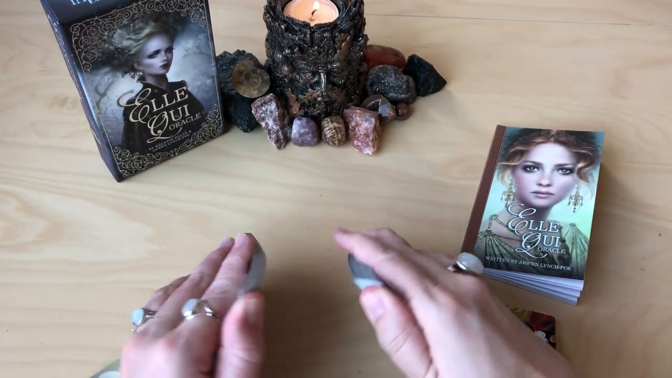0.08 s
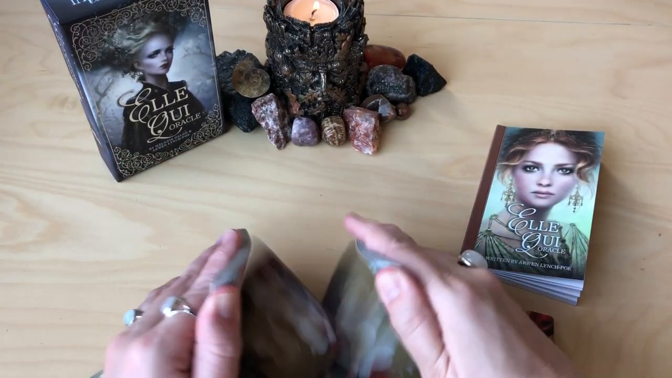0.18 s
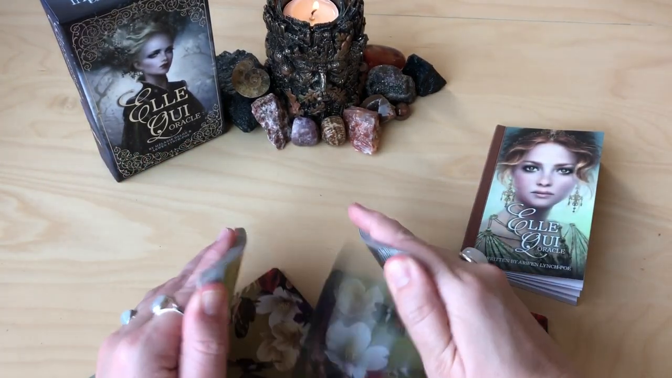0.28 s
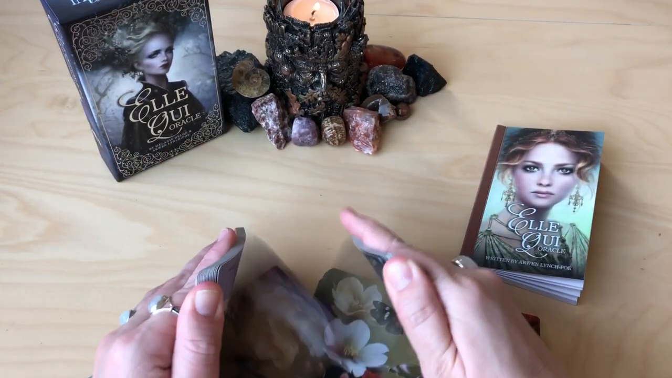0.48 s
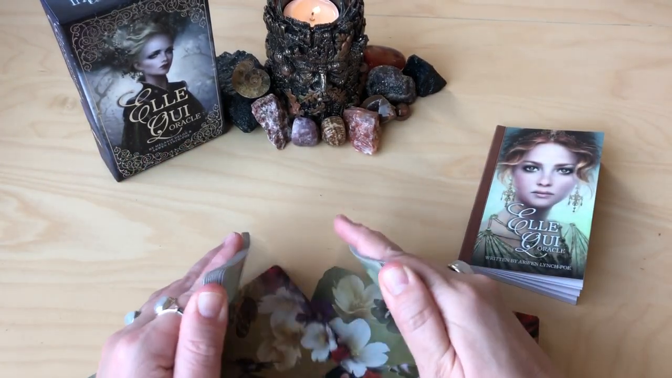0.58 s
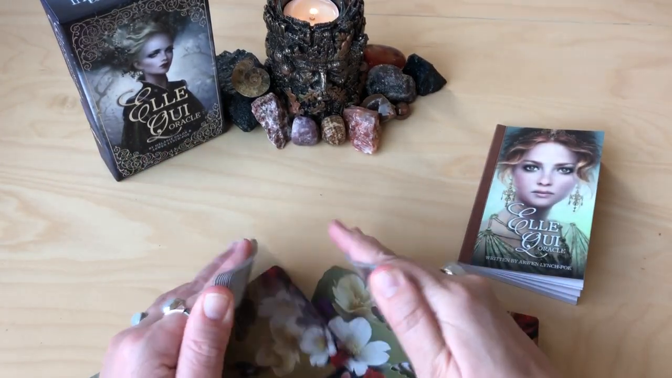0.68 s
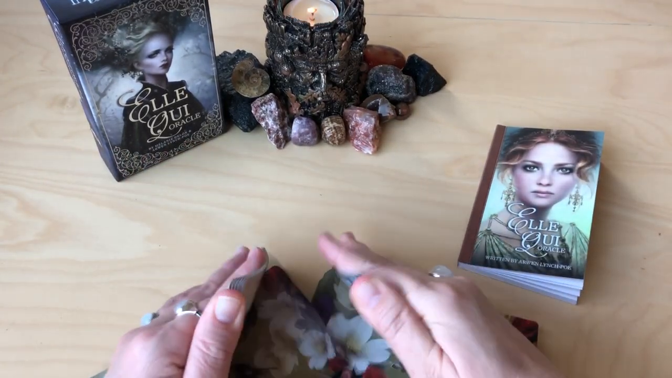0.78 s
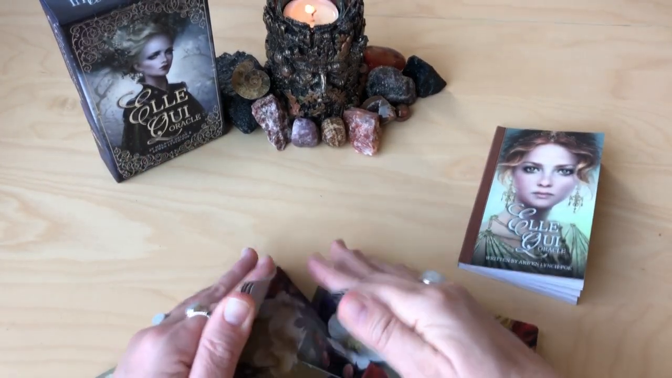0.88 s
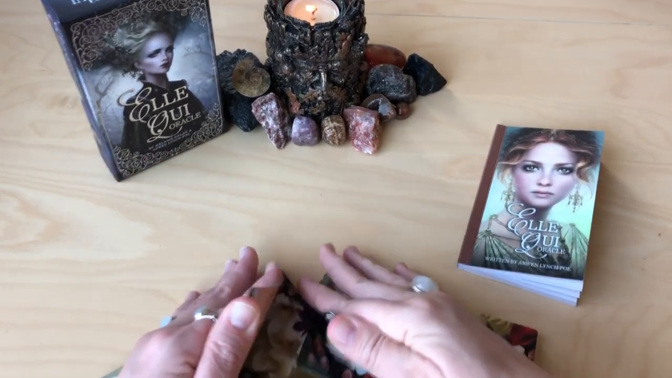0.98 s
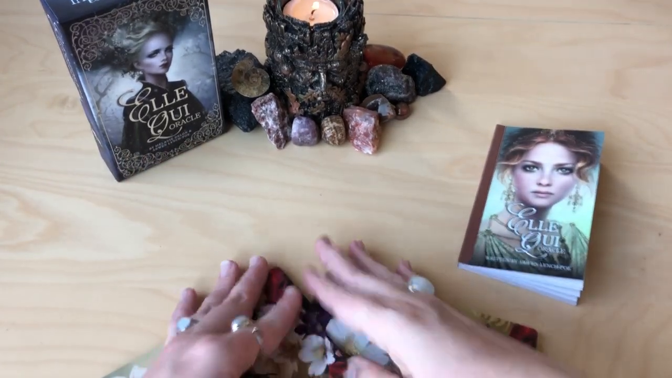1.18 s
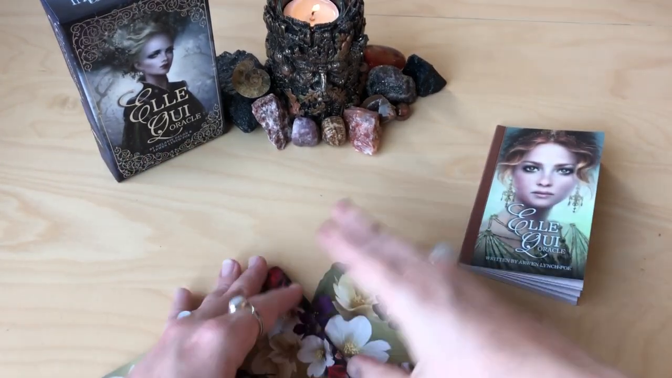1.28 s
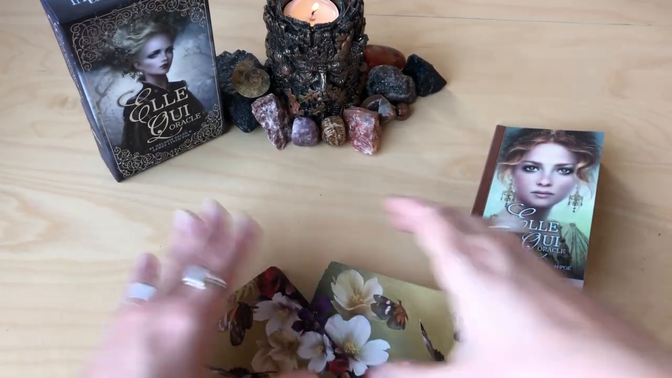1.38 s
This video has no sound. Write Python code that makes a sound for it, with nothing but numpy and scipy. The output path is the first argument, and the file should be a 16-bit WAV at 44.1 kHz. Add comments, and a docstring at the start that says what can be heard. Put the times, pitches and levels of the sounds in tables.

```python
"""Large stiff cards snap brightly one by one as two halves of a deck are riffled together on a wooden table.
Each snap is a jolt and a noisy slip that ring the card edge, with a crack, a click and a fading shiver.
Wobbling tones make air claps between clumps and one landing's low pop; other landings pop and ring the table.
Noise makes the rest: faces rustle in grains and scuff, hands rumble through the table, the quiet room adds a
short tail and a faint hum, and at the start a faint hiss dies away."""
import sys
import numpy as np
from scipy import signal
from scipy.fft import rfft, irfft
from scipy.io import wavfile
from scipy.ndimage import uniform_filter1d

SR = 44100
rng = np.random.default_rng(int(sys.argv[2]) if len(sys.argv) > 2 else 0)


def persist_wave(psi):
    """Save psi, clipped to +-1, as 16-bit WAV."""
    counts = np.round(np.clip(psi, -1, 1) * 32767).astype(np.int16)
    wavfile.write(sys.argv[1], SR, np.atleast_2d(counts).T)


def volts(x):
    """Linear amplitude factor 10**(x/20) for a level x in dB, scalar or array-like."""
    e = np.asarray(x, float) / 20
    return 10 ** e


N = 61740  # length in samples: 1.4 s


def level(x, db):
    """Scale to an rms level in dB."""
    return x * volts(db) / np.sqrt(np.mean(x ** 2))


def colour(x, points):
    """Shape the spectrum of a signal by (f/Hz, level/dB) points."""
    points = np.array(points)
    freqs = np.maximum(np.arange(len(x) // 2 + 1) * SR / len(x), 1)
    gain_db = np.interp(np.log(freqs), np.log(points[:, 0]), points[:, 1])
    return irfft(rfft(x) * volts(gain_db), len(x))


def high(x, hz):
    """Let through what lies above hz, with a second-order filter."""
    return signal.sosfilt(signal.butter(2, hz, "high", fs=SR, output="sos"), x)


def add(out, start_s, x):
    """Mix x into out from a start time, cutting it at the end."""
    i = int(start_s * SR)
    out[i:i + len(x)] += x[:max(len(out) - i, 0)]


def burst(t, rise_ms, fall_ms):
    """Smooth swell to 1, then an exponential fall to 1/e in every fall_ms."""
    rise, fall = max(rise_ms, .05) / 1000, max(fall_ms, .1) / 1000
    swell = np.sin(np.pi / 2 * np.minimum(t / rise, 1)) ** 2
    return np.where(t < rise, swell, np.exp(-np.maximum(t - rise, 0) / fall))


def ring(x, hz, t60):
    """One damped mode driven by x; it falls 60 dB in t60 seconds."""
    pole = np.exp(2j * np.pi * min(hz, .45 * SR) / SR - np.log(1000) / (t60 * SR))
    return signal.lfilter([1 - abs(pole)], [1, -pole], x).imag


def peak_to_one(x):
    """Scale so that the loudest stretch of 40 samples has an rms of 1."""
    return x / np.sqrt(uniform_filter1d(x ** 2, size=40).max())


# tone of the room's hum: [f/Hz, level/dB per Hz], only the shape counts
ROOM = [(25, -9), (60, -5.5), (108, 2), (150, -10.5), (210, -6), (300, -4), (420, -19), (1100, -22.5),
        (3400, -27), (5000, -31.5), (9000, -33.5), (16000, -39)]


def room_floor():
    """Steady noise, strongest in the bass, makes the faint room hum."""
    return level(colour(rng.standard_normal(N), ROOM), -68.5)


# tone of the faint hiss at the start: [f/Hz, level/dB], only the shape counts
FAINT = [(1200, -11), (2200, -11), (3700, -2), (4600, -14), (5700, -7), (8000, -17), (15000, -20)]


def faint_hiss():
    """Coloured noise that fades to silence soon after the start."""
    end_s, fade_s = 0.082, 0.028
    fade = np.clip((end_s - np.arange(N) / SR) / fade_s, 0, 1)
    return fade * level(colour(rng.standard_normal(N), FAINT), -73.5)


# room tail: [band f/Hz, time to fall 60 dB t/s]
TAIL = [(300, 0.42), (1500, 0.26), (5000, 0.14), (12000, 0.084)]


def room(x):
    """Diffuse reflections, noise in several bands, die faster in the treble."""
    tail_db, gap_ms = -18, 6.4
    t, tail = np.arange(SR // 2) / SR, 0
    for hz, t60 in TAIL:
        edges = [hz / 2, min(hz * 1.47, .45 * SR)]
        sos = signal.butter(1, edges, "band", fs=SR, output="sos")
        band = signal.sosfilt(sos, rng.standard_normal(len(t)))
        tail = tail + band * volts(-60 * t / t60)
    # silent for half the gap, full after one and a half gaps
    tail = tail * np.clip(t * 1000 / gap_ms - .5, 0, 1)
    return volts(tail_db) * signal.fftconvolve(x, tail / np.sqrt(np.sum(tail ** 2)))[:N]


# hand activity: [t/s, rustle level/dB, rumble through the table level/dB]
HANDS = [(0.17, -63.5, -61), (0.252, -53, -54), (0.372, -52, -60.5), (0.416, -49.5, -54),
         (0.574, -44.5, -56.5), (0.686, -47.5, -55), (0.796, -50, -48.5), (0.992, -53, -52),
         (1.076, -49.5, -63), (1.214, -54, -70), (1.286, -63.5, -73.5), (1.4, -75.5, -69)]
# tone of card on card, for rustle, scuffs and snaps: [f/Hz, level/dB per Hz], only the shape counts
RUSTLE = [(180, -28), (300, -5), (678, 2.5), (2650, 0.5), (3890, -2), (4910, -2), (8090, -6), (15000, -12),
          (16000, -33)]
# tone of the table rumble: [f/Hz, level/dB per Hz], only the shape counts
RUMBLE = [(15, -44.5), (25, -32), (48, 5), (102, 4), (330, 3), (509, -3), (708, -6.5), (900, -1),
          (1170, 1.5), (1980, -120)]


def hands():
    """Card faces slide and tick as short grains of noise; hands rumble through the table as low noise."""
    start_s, grains_per_s, grain_fall_ms = 0.189, 770, 2
    spread_db, largest_spreads = 2.5, 2.2  # random extra level of a grain, and its limit in spreads
    smooth_db = -18  # even rustle beneath the grains
    t, activity = np.arange(N) / SR, np.array(HANDS)
    on = np.clip((t - start_s) / 0.003, 0, 1)
    extra_db = spread_db * np.minimum(rng.exponential(size=N), largest_spreads)
    hits = (rng.random(N) < grains_per_s / SR) * volts(extra_db)
    grains = signal.fftconvolve(hits, burst(t[:512], 0.4, grain_fall_ms))[:N]
    roughness = level(grains, 0) + volts(smooth_db)
    rustle = level(colour(rng.standard_normal(N) * roughness, RUSTLE), 0)
    rumble = level(colour(rng.standard_normal(N), RUMBLE), 0)
    rustle = rustle * volts(np.interp(t, activity[:, 0], activity[:, 1]))
    rumble = rumble * volts(np.interp(t, activity[:, 0], activity[:, 2]))
    return on * (rustle + rumble)


# card faces scuffing: [t/s, level/dB before swell and fade, swell t/ms, fade t/ms, low edge f/Hz]
SCUFFS = [(.449, -43, 3, 1.1, 1500), (1.088, -39, 9.3, 4.2, 1190), (1.137, -36, 4.4, 4.6, 1500),
          (1.3, -44.5, 4.1, 1.3, 3000)]


def scuffs():
    """Short swelling brushes of card on card, made of noise without its bass."""
    out, t = np.zeros(N), np.arange(2048) / SR
    for start_s, db, swell_ms, fade_ms, low_hz in SCUFFS:
        noise = colour(rng.standard_normal(len(t)), RUSTLE)
        brush = level(high(high(noise, low_hz), low_hz), db)
        add(out, start_s, brush * burst(t, swell_ms, fade_ms))
    return out


# cards landing on the pile: [t/s, level/dB, pop pitch f/Hz, table against pop level/dB]
LANDINGS = [(0.239, -38.5, 624, -13), (0.256, -43, 460, -5.5), (0.313, -42.5, 370, -14),
            (0.355, -44, 372, -17), (0.372, -44.5, 358, -8), (0.403, -37.5, 783, -18),
            (0.432, -37, 320, -20), (0.451, -35, 870, -41), (0.464, -30.5, 890, -18.5),
            (0.506, -46, 280, -23), (0.535, -42, 816, -9), (0.559, -38, 252, -26), (0.581, -36, 638, -18),
            (0.594, -41.5, 380, -9), (0.617, -43, 283, -12), (0.641, -42, 346, -30),
            (0.654, -37.5, 325, -14), (0.678, -40.5, 220, -13), (0.694, -37.5, 830, -23),
            (0.711, -39, 320, -17), (0.729, -40, 174, -14), (0.752, -33.5, 816, -29),
            (0.771, -39, 780, -26), (0.786, -37.5, 252, -18), (0.803, -37.5, 800, -16),
            (0.834, -38, 791, -16), (0.85, -38, 161, -15), (0.872, -31, 900, -16), (0.907, -41, 132, -15),
            (0.925, -37, 157.4, -7.5), (0.954, -33, 930, -20), (0.967, -33.5, 295, -14),
            (0.975, -35.5, 162, -28), (1.002, -33.5, 810, -22), (1.013, -40, 850, -0.5),
            (1.034, -36.5, 140, -18), (1.102, -39, 720, 1), (1.115, -37.5, 127, -3),
            (1.144, -27.5, 440, -13), (1.169, -38.5, 140, -4.5), (1.311, -53, 153, -6)]
# table top modes, before small random changes: [f/Hz, level/dB, time to fall 60 dB t/s]
TABLE = [(65.2, -18.5, 0.44), (113, -5.5, 0.16), (140, -6, 0.43), (265, -8, 0.12), (435.5, -7, 0.15)]


def landings():
    """Each landing gives a short sagging pop and rings the table, each mode a little differently every time."""
    push_ms, pop_cycles, sag = 1.55, 0.97, 0.33  # rise time, pop fall in cycles, extra pitch at the start
    out, t = np.zeros(N), np.arange(SR // 2) / SR
    for start_s, db, pop_hz, table_db in LANDINGS:
        turns = pop_hz * t
        pop = np.sin(2 * np.pi * turns * (1 + sag * np.exp(-turns)))
        pop = pop * burst(t, push_ms, 1000 * pop_cycles / pop_hz)
        table = 0
        for hz, mode_db, t60 in TABLE:
            level_change, pitch_change = rng.standard_normal(2)
            mode = np.sin(2 * np.pi * hz * (1 + 0.019 * pitch_change) * t)
            table = table + volts(mode_db + 1.7 * level_change) * mode * volts(-60 * t / t60)
        table = table * np.minimum(t * 1000 / push_ms, 1)
        add(out, start_s, volts(db) * (high(pop, pop_hz / 2) + volts(table_db) * table))
    return out


# air claps between clumps, and one low pop of a landing (1.103 s, 289 Hz):
# [t/s, level/dB before 1 dB is added, middle pitch f/Hz, swell t/ms, fall t/ms]
CLAPS_AND_LOW_POP = [(.2435, -23, 1343, 2.4, 2.4), (.244, -33.5, 995, 1.3, 2.3),
                     (.2445, -24.5, 1866, 3.45, 0.6), (.464, -20.5, 1667, 4.8, 2.7),
                     (.465, -27, 1106, 5.8, 3.5), (.583, -16, 1810, 1.16, 2.8),
                     (0.585, -21, 1442, 2.2, 1.74), (.584, -19, 2136, 1.1, 1.8),
                     (0.59, -31, 1633, 1.9, 2.5), (.668, -36.5, 1380, 1.6, 1.5),
                     (0.788, -35, 1040, 1.8, 2.6), (.962, -38, 1320, 1.5, 2.5), (1.0, -36.5, 1020, 1, 3.5),
                     (1.032, -34, 925, 1.7, 3), (1.031, -31.5, 1330, 0.8, 2.3),
                     (1.103, -32.5, 1080, 3.5, 3), (1.103, -37.5, 289.3, 4.9, 10.7),
                     (1.139, -32.5, 1920, 2.8, 1.6), (1.144, -27.5, 1510, 2.9, 3.3),
                     (1.142, -33.5, 1253, 1.6, 7.3), (1.146, -38, 814, 1.4, 8.5),
                     (1.173, -44, 1700, 2.4, 4.8)]


def claps_and_low_pop():
    """Air claps between clumps, and one low pop of a landing, each ring a few hollow, uneven cycles."""
    out, t = np.zeros(N), np.arange(2048) / SR
    for start_s, db, hz, swell_ms, fall_ms in CLAPS_AND_LOW_POP:
        noise = rng.standard_normal(len(t))
        wobble = uniform_filter1d(uniform_filter1d(noise, size=24), size=24) * 6
        phase = 2 * np.pi * np.cumsum(hz * (1 + .07 * wobble)) / SR
        tone = np.sin(phase + 3 * noise[0])  # random starting point
        uneven = 1 + 0.39 * wobble[::-1]
        add(out, start_s, volts(db + 1) * tone * uneven * burst(t, swell_ms, fall_ms))
    return out


# card snaps: [t/s, level/dB, treble against ring level/dB before the trims, ring f/Hz,
#              length t/ms, of which the slip's fall takes 0.75]
SNAPS = [(0.1908, -43, 10, 5490.0, 1.3), (0.1977, -56, -18, 2320, 9), (0.2016, -49.5, -5, 2820, 5),
         (0.2118, -60, -4.5, 3160, 3.5), (0.222, -40, 3, 5660, 0.54), (0.2302, -38.5, 0, 5900, 4.2),
         (0.242, -25.5, -2.5, 5990.0, 3.3), (0.2495, -15.5, 25, 7600, 2), (0.26, -44, 16, 3290.0, 3.0),
         (0.2701, -30.5, 20, 7900, 1.4), (0.3119, -40, 4, 7400, 2.4), (0.3252, -36, -17.5, 5430, 0.8),
         (0.3532, -17, 4, 2950, 0.6), (0.3639, -33.5, 4, 6850.0, 3.3), (0.4192, -33, 10, 4920, 1.8),
         (0.4267, -34, 1.5, 3120, 2.7), (0.4334, -43, 8, 6360, 1.3), (0.4474, -26.5, 3.5, 3630, 3.1),
         (0.4633, -20, -20, 3330, 3.6), (0.468, -24.5, -8.5, 2930, 1.4), (0.477, -35.0, -5.0, 2940, 3.0),
         (0.5046, -24, 12.5, 4400, 0.84), (0.532, -38, 16, 3300, 1.1), (0.5556, -27, 2.5, 4670, 1.2),
         (0.5712, -28, -6, 3020, 0.66), (0.5823, -17, -3, 5560, 0.77), (0.587, -15.5, 16, 2220.0, 0.7),
         (0.6146, -36.5, 0, 2100, 7.6), (0.6314, -32.5, -13, 4860, 2.3), (0.6409, -23, 18, 2220.0, 0.67),
         (0.6527, -41, 8, 5600, 1.2), (0.6653, -30.5, -1, 3350, 3.3), (0.6691, -30.5, -12, 4800, 1.4),
         (0.672, -30.5, 2, 2730, 1.3), (0.6765, -35, 14, 6440, 1), (0.7122, -41, -2, 7990.0, 1.2),
         (0.7163, -36.5, 17, 2300, 1.9), (0.7217, -38, 0, 5400, 1.2), (0.7276, -24, -4, 4940, 0.34),
         (0.7397, -22.5, 2.5, 4800, 0.53), (0.753, -54, 14, 4220, 0.88), (0.764, -44, -13, 2520, 2.3),
         (0.773, -38, -13, 5500, 0.77), (0.7863, -22.5, -3, 2930, 0.83), (0.8155, -25, -19, 6560, 1.5),
         (0.82, -35, -22, 5600, 1.9), (0.8238, -27.5, 13, 3140.0, 1.4), (0.8357, -39, 20, 7040, 2.1),
         (0.848, -20, 2.5, 2740, 0.51), (0.8556, -38.0, -16, 2650, 2.75), (0.8669, -21, -21.5, 6670, 0.67),
         (0.8833, -21.5, 3, 2880, 1.2), (0.8963, -21.5, 3, 7000, 2), (0.907, -40, 3, 6200, 1.2),
         (0.9179, -18.5, -1, 5070, 0.38), (0.9267, -22, 5, 3060, 1.7), (0.9528, -34, -12.0, 5330, 0.55),
         (0.962, -18, 2.5, 4920, 1.8), (0.9699, -24, -15, 3080, 2.1), (0.9793, -42, 9, 4430, 2.2),
         (1.0003, -28, -24.5, 5500, 1.1), (1.0087, -19.5, -4, 5300, 0.23), (1.0306, -18.5, -2, 6400, 0.4),
         (1.094, -31, 6, 2300, 3.1), (1.0991, -27, 16, 4570, 0.99), (1.1042, -26.5, -19, 3200, 0.7),
         (1.1071, -24, -8.5, 5330, 3), (1.1168, -37.5, -16, 5400, 2.8), (1.1414, -25, 8, 5800, 0.88),
         (1.1455, -25, 2, 3400, 2.6), (1.24, -59, -8, 3660, 0.6), (1.2549, -71, -12.0, 2470, 2.1),
         (1.3054, -35, 0.5, 5320, 1.1), (1.316, -50, -11.5, 5800, 0.8), (1.3392, -53.5, -1, 7020.0, 1.5)]
# overtones of a snapped card edge: [multiple of ring pitch, level/dB, time to fall 60 dB t/s]
CARD = [(1, 5, 0.0078), (1.85, -7.5, 0.0022), (2.5, -18.5, 0.009), (.6, -16, .003)]


def snaps():
    """A jolt and noisy slip briefly ring the card edge; a click, a bright crack and a fading shiver ride on it."""
    crack_trim_db, ring_trim_db, click_db = -0.5, 0.5, 0.5
    rise_ms, shiver_db, shiver_fall_ms = 0.7, -11.5, 3.63
    click_share, shiver_share = 0.43, 0.31  # low edges as shares of ring pitch
    kick = 3.1  # jolt against slip
    out, t = np.zeros(N), np.arange(1024) / SR
    for start_s, db, treble_db, hz, length_ms in SNAPS:
        slip_noise, click_noise, shiver_noise = rng.standard_normal((3, len(t)))
        slip = burst(t, rise_ms, 0.75 * length_ms)
        jolt = kick * (np.arange(len(t)) == slip.argmax())  # one sample at the top of the slip
        drive = slip_noise * slip + jolt

        edge = peak_to_one(sum(volts(d) * ring(drive, hz * k, t60) for k, d, t60 in CARD))
        click = peak_to_one(high(colour(click_noise, RUSTLE), click_share * hz) * slip)
        body = peak_to_one(high(edge, click_share * hz) + volts(click_db) * click)
        crack = volts(crack_trim_db + treble_db) * peak_to_one(high(high(drive, 6500), 7200))

        rough = high(high(colour(shiver_noise, RUSTLE), shiver_share * hz), shiver_share * hz)
        shiver = volts(shiver_db) * rough / np.std(rough) * burst(t, rise_ms, shiver_fall_ms)
        # share the level between ring and treble
        snap = (volts(ring_trim_db) * body + crack) / np.hypot(1, volts(treble_db))
        # begin early, two thirds of the rise before the listed time
        add(out, start_s - rise_ms / 1500, volts(db) * (snap + shiver))
    return out


def scene():
    """Cards near the microphone, their room tail, the room's hum and the faint opening hiss."""
    cards = hands() + scuffs() + landings() + claps_and_low_pop() + snaps()
    return (cards + room(cards) + room_floor() + faint_hiss())[None]


def top_cut(x):
    """Nothing passes above the cut-off."""
    return signal.sosfilt(signal.butter(12, 17140, fs=SR, output="sos"), x)


def record(dry):
    """The microphone trims both ends: the deep bass and the highest treble."""
    low_hz, top_hz = 35, 16300
    no_bass = high(high(dry, low_hz), low_hz)
    top = signal.ellip(10, .2, 80, top_hz, fs=SR, output="sos")
    mix = signal.sosfilt(top, no_bass)
    return top_cut(mix)


dry = scene()
out = record(dry)
persist_wave(out)
```